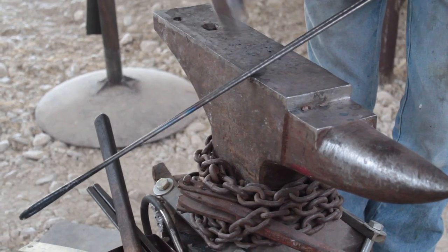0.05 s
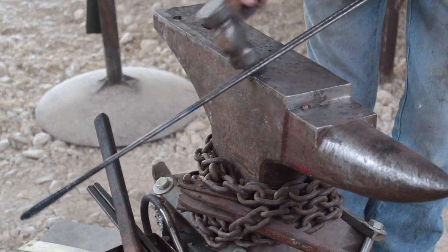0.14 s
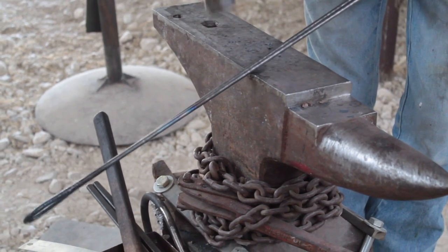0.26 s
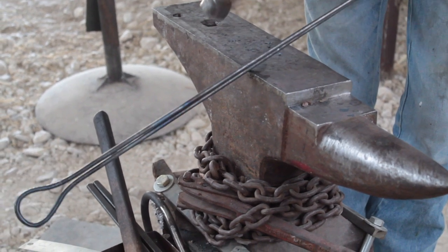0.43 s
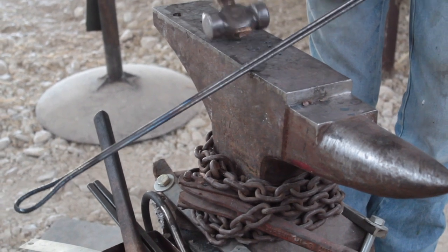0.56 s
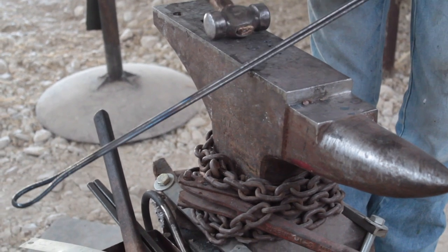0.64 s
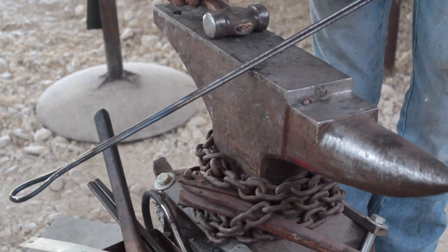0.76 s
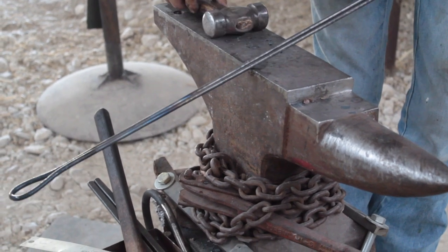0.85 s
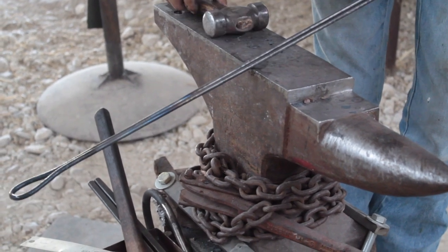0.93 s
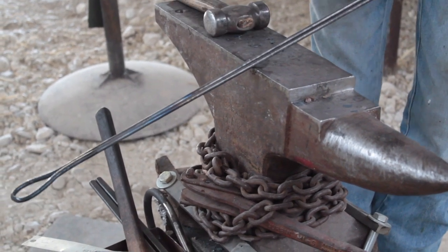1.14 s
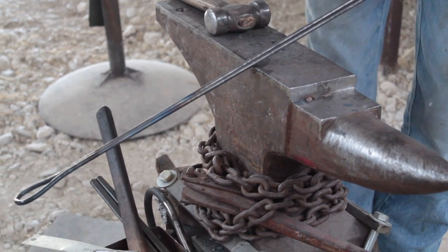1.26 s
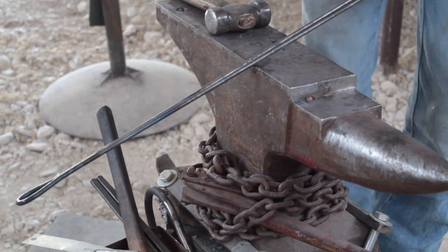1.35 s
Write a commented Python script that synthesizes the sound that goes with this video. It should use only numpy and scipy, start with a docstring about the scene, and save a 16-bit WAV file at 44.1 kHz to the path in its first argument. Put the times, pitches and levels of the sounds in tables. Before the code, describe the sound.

One heavy hammer blow on an anvil, followed by bright metallic bounces and lower clanks.

```python
"""A smith's workshop still rings from the blow before. The hammer lands on a steel bar lying on an anvil: a
dull, heavy knock that ducks the limiter, which then slowly recovers. The hammer bounces on the bare anvil face
in bright clinks, topples onto its side with lower clanks and comes to rest with a faint tick. Knocks, clinks
and clanks each ring the anvil and the loose bar and chain on it, and the room answers over quiet workshop air."""
import sys
import numpy as np
from scipy import signal
from scipy.fft import rfft, irfft, next_fast_len
from scipy.io import wavfile
from scipy.ndimage import uniform_filter1d, minimum_filter1d, map_coordinates

SR = 44100
rng = np.random.default_rng(int(sys.argv[2]) if len(sys.argv) > 2 else 0)


def file_out(sig):
    """Save sig as 16-bit WAV at sys.argv[1]."""
    # one column per channel
    cols = np.atleast_2d(sig).T
    # limit, then scale
    lim = np.clip(cols, -1, 1)
    pcm = np.round(lim * 32767).astype(np.int16)
    wavfile.write(sys.argv[1], SR, pcm)


N = 61739

# Cues, one row a contact (t/s, relative level/dB)
BAR_BLOWS = [(-.26, 17.5), (0.2, 24.5)]  # heavy blows on the bar
FACE_TAPS = [(0.667, 8.5), (.6890, 6), (0.7079, 3), (0.7589, 2), (0.7701, 2.5)]  # the hammer's face bouncing on the anvil
SIDE_DROPS = [(0.9511, 9.5), (0.9658, -11), (0.9741, -11.5), (1.008, 5), (1.0360, -1)]  # the head dropping on its side and rocking
REST_TICKS = [(1.2862, -17.5)]  # the hammer coming to rest

# EQ curves of each contact and of the room's answer to it (f/Hz, relative level/dB)
BLOW_EQ = [(40, -16), (110, -24), (170, -4.5), (330, -14.5), (480, 0), (900, -0.5), (1500, 4),
           (2300, -16.5), (3400, -9.5), (4400, -4.5), (8000, -17), (11000, -19.5), (16000, -51)]
BLOW_ROOM_EQ = [(40, -18.5), (100, -41.5), (160, -11.5), (200, -18.5), (340, -10.5), (700, -12.5),
                (1550, -7), (1860, -5.5), (2300, -13.5), (3600, -17.5), (5400, -20), (8800, -31),
                (9800, -31.5), (13000, -39.5), (16000, -61)]
TAP_EQ = [(50, -68), (200, -20.5), (450, -9), (800, -12.5), (1100, -13), (1800, 5), (2100, -2), (2700, 5),
          (3700, 2), (5300, -5.5), (6400, -23), (8500, -41.5), (16000, -65)]
TAP_ROOM_EQ = [(60, -48), (160, -13), (300, -26), (450, -2.5), (600, -21), (820, 4), (1000, -9),
               (1850, -3.5), (2130, -3.5), (2700, -1), (3500, 0), (5300, -7), (6400, -23.5), (8500, -38.5),
               (14000, -63)]
DROP_EQ = [(50, -39.5), (300, -18.5), (700, -11), (950, -0.5), (1400, -10), (1950, 2), (2650, 2.5),
           (3300, -11), (4000, 2), (4800, -17.5), (6200, -33.5), (7100, -20), (8500, -57.5), (16000, -78)]
DROP_ROOM_EQ = [(60, -39.5), (160, -21), (340, -16.5), (700, -12), (950, -5.5), (1350, -14), (1850, 2),
                (2300, -13.5), (2620, 0.5), (3090, -18.5), (4050, -11), (4700, -22.5), (6300, -39),
                (7100, -30), (8000, -49), (14000, -63)]
TICK_EQ = [(200, -22), (2000, 13), (6000, -4), (9500, -21), (14000, -32.5)]

# Modes of the anvil and of the loose bar and chain on it (f/Hz, t60/s, then relative level/dB under a blow, a
# tap and a drop)
STEEL_MODES = [(345.9, 0.62, -52, -60.5, -51), (450.5, 0.44, -81, -45.5, -60), (824, 0.29, -80, -42.5, -81),
               (836, 0.39, -81, -44.5, -47.5), (1189, .4, -68.5, -46, -65.5), (1512, 1.2, -57, -49.5, -48),
               (1576, 0.55, -48, -52.5, -58.5), (1864, 0.55, -38.5, -45, -33),
               (3354, 0.32, -70, -38.5, -44), (3405, 0.23, -83, -47, -66.5), (3620, 0.4, -69, -47, -74),
               (4130, 0.85, -66.5, -44.5, -59), (4260, 0.88, -61, -58.5, -64), (4670, .4, -75, -42.5, -76),
               (5130, 0.35, -92, -47, -58), (5360, 1.1, -67, -74, -71.5), (5650, 0.23, -82, -45, -71.5),
               (7570, 0.27, -86, -64.5, -86), (9850, 0.17, -64, -75.5, -95.5)]
# Damped knock of bar and anvil under the heavy hammer (f/Hz, t60/s, relative level/dB)
KNOCK_MODES = [(156.2, 0.33, -47), (232.5, 0.13, -39), (318.6, 0.039, -25.5), (704, 0.012, -19),
               (1237, 0.0059, -9), (1442, 0.0097, -10), (1898, 0.016, -16.5)]
# Modes of the hammer lying on its side (f/Hz, t60/s, relative level/dB)
HAMMER_MODES = [(2566, 0.54, -36), (2587, .58, -37), (2647, 0.19, -32.5), (3975, .22, -41.5),
                (7030, .12, -53.5)]
# Reverb time of the workshop (f/Hz, t60/s)
ROOM_DECAY = [(150, 1.11), (400, 1.64), (1100, 1.09), (2800, 0.97), (7000, 0.81), (14000, 0.34)]
# EQ curve of the workshop air (f/Hz, relative level/dB)
AIR_EQ = [(30, -7.5), (90, -18), (160, -1.5), (900, 7), (2500, 0), (6000, -21), (15000, -49.5)]

SCUFF_S, SCUFF_DB = 0.022, -23.5  # the bar is pressed flat just before the blow bites
ONSET_S = 0.00048  # a contact takes this long to set the modes going
RESONANCE_SPREAD_DB, RESONANCE_SPACING_HZ = 3.2, 22
AIR_DB = -53.5
LOW_CUT_HZ, HIGH_CUT_HZ = 189, 16950
CEILING_DB, RELEASE_DB_PER_S, CLIP_LEVEL = 0.1, 65, 0.94


def blows():
    """The bar cushions the hammer: a dull, heavy knock that fills the room and rings the anvil."""
    out, peaks = np.zeros(N), steel_resonances()
    modes = [(hz, t60, db) for hz, t60, db, _, _ in STEEL_MODES]
    swell = np.linspace(0, 1, round(SCUFF_S * SR)) ** 2
    for s, db in BAR_BLOWS:
        knock = ring(KNOCK_MODES, blur_hz=1) + amp(-5.5) * clatter(BLOW_EQ, t60=0.021)
        anvil = ring(modes, blur_hz=4.0)
        tail = amp(-9.5) * room(BLOW_ROOM_EQ, peaks, build_s=0.0018)
        add(out, s, amp(db) * (knock + anvil + tail))
        scuff = swell * noise(BLOW_ROOM_EQ)[:len(swell)]
        add(out, s - SCUFF_S, amp(SCUFF_DB) * scuff)
    return out


def taps():
    """The hammer bounces, steel on bare steel: short, bright clinks."""
    out, peaks = np.zeros(N), steel_resonances()
    modes = [(hz, t60, db) for hz, t60, _, db, _ in STEEL_MODES]
    for s, db in FACE_TAPS:
        clink = amp(2) * click(TAP_EQ) + amp(-1) * clatter(TAP_EQ, t60=0.034)
        anvil = ring(modes, blur_hz=2.7)
        tail = amp(-5) * room(TAP_ROOM_EQ, peaks, build_s=0.0038)
        add(out, s, amp(db) * (clink + anvil + tail))
    return out


def drops():
    """The head falls on its side: lower clanks in which hammer and anvil both ring."""
    out, peaks = np.zeros(N), steel_resonances()
    modes = [(hz, t60, db) for hz, t60, _, _, db in STEEL_MODES] + HAMMER_MODES
    for s, db in SIDE_DROPS:
        clank = amp(-2.5) * click(DROP_EQ) + amp(1.5) * clatter(DROP_EQ, t60=0.025)
        steel = ring(modes, blur_hz=0.35)
        tail = amp(-3.5) * room(DROP_ROOM_EQ, peaks, build_s=0.0027)
        add(out, s, amp(db) * (clank + steel + tail))
    return out


def ticks():
    """The hammer settles: a light, thin touch of metal, heard mostly through the room."""
    out = np.zeros(N)
    for s, db in REST_TICKS:
        touch = clatter(TICK_EQ, t60=0.082)
        tail = amp(1.5) * room(TICK_EQ, steel_resonances(), build_s=0.00305)
        add(out, s, amp(db) * (touch + tail))
    return out


def ring(modes, blur_hz):
    """Struck steel sings in decaying sines; a slight phase drift blurs each pitch."""
    t = np.arange(N) / SR
    out = np.zeros(N)
    for hz, t60, db in modes:
        drift = np.cumsum(rng.standard_normal(N)) * np.sqrt(2 * np.pi * blur_hz / SR)
        phase = 2 * np.pi * hz * t + uniform_filter1d(drift, size=256)
        out += amp(db + rng.normal() - 60 * t / t60) * np.sin(phase)
    attack = 1 - np.exp(-(t / ONSET_S) ** 2)
    return out * attack


def click(eq, size=4096):
    """The transient of a contact: a minimum-phase pulse of energy 1."""
    gain = amp(curve_at(eq, np.fft.rfftfreq(size, 1 / SR)))
    cepstrum = irfft(np.log(gain))
    cepstrum[1:size // 2] *= 2  # folding packs the energy at the front
    cepstrum[size // 2 + 1:] = 0
    pulse = irfft(np.exp(rfft(cepstrum)))
    return np.pad(pulse, (0, N - size)) / np.linalg.norm(pulse)


def clatter(eq, t60):
    """The body of a contact: dense, quickly damped ringing of energy 1."""
    t = np.arange(N) / SR
    burst = rng.standard_normal(N) * amp(-60 * t / t60)
    body = signal.fftconvolve(burst, click(eq))[:N]
    return body / np.linalg.norm(body)


def steel_resonances():
    """Many weak, narrow resonances of the steel, as random gains by frequency."""
    hz = np.fft.rfftfreq(N, 1 / SR)
    knots = rng.standard_normal(int(hz[-1] / RESONANCE_SPACING_HZ) + 4)
    spread_db = RESONANCE_SPREAD_DB * np.minimum(hz / 3000, 1)
    return amp(spread_db * map_coordinates(knots, [hz / RESONANCE_SPACING_HZ]))


def room(eq, peaks, build_s, size=512):
    """The workshop's reverb tail, energy 1: it blooms, and the treble dies first."""
    hz, t, spectra = signal.stft(noise(eq, peaks), SR, nperseg=size)
    decay = amp(-60 * t / curve_at(ROOM_DECAY, hz)[:, None])
    tail = signal.istft(spectra * decay, SR, nperseg=size)[1][:N]
    tail *= 1 - np.exp(-np.arange(N) / SR / build_s)
    return tail / np.linalg.norm(tail)


def workshop_air():
    """A quiet, steady bed of room tone."""
    return amp(AIR_DB) * noise(AIR_EQ)


def noise(eq, peaks=1):
    """Coloured noise of rms 1, with narrow peaks if given."""
    gain = peaks * amp(curve_at(eq, np.fft.rfftfreq(N, 1 / SR)))
    x = irfft(rfft(rng.standard_normal(N)) * gain, N)
    return x / np.sqrt(np.mean(x ** 2) + 1e-20)


def amp(db):
    """Decibels to gain."""
    return 10 ** (np.asarray(db) / 20)


def curve_at(points, hz):
    """Read (f/Hz, value) points on a log frequency axis."""
    f, values = np.transpose(points)
    return np.interp(np.log(hz + 1), np.log(f + 1), values)


def add(out, s, x):
    """Mix x into out from time s, which may lie before the start."""
    i = round(s * SR)
    x, i = x[max(-i, 0):], max(i, 0)
    out[i:i + len(x)] += x[:N - i]


def scene():
    """All contacts over the workshop air, in mono."""
    return (blows() + taps() + drops() + ticks() + workshop_air())[None]


def record(dry):
    """Microphone low cut, a limiter that clamps at once and lets go steadily, clipped tips, high cut."""
    low_cut = signal.butter(2, LOW_CUT_HZ, "high", fs=SR, output="sos")
    x = signal.sosfilt(low_cut, dry[0])
    over_db = np.maximum(20 * np.log10(np.abs(x) + 1e-9) - CEILING_DB, 0)
    recovery_db = RELEASE_DB_PER_S * np.arange(N) / SR
    duck_db = np.maximum.accumulate(over_db + recovery_db) - recovery_db
    smooth_gain = uniform_filter1d(minimum_filter1d(amp(-duck_db), size=33), size=33)
    x = np.clip(x * smooth_gain, -CLIP_LEVEL, CLIP_LEVEL)
    size = next_fast_len(N + SR // 2)
    passband = np.fft.rfftfreq(size, 1 / SR) < HIGH_CUT_HZ
    return irfft(rfft(x, size) * passband, size)[None, :N]


dry = scene()
out = record(dry)
file_out(out)
```